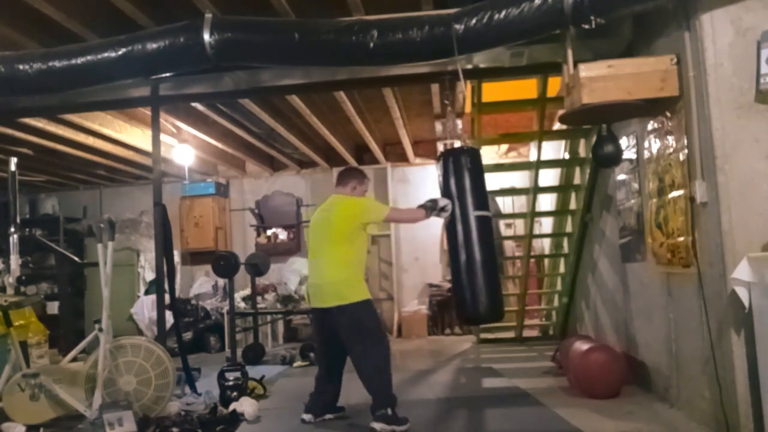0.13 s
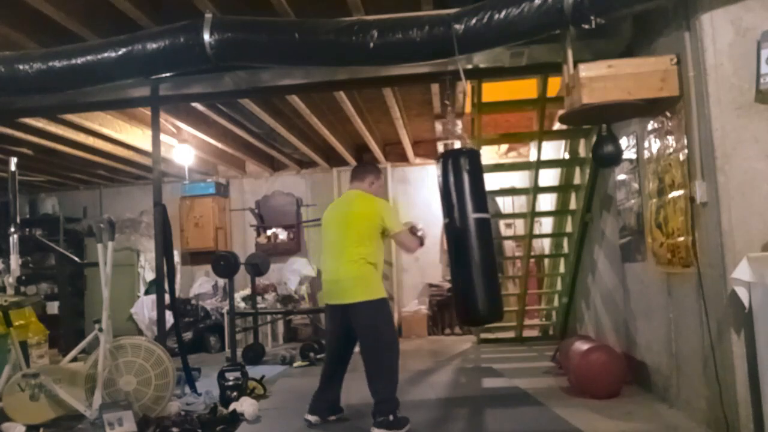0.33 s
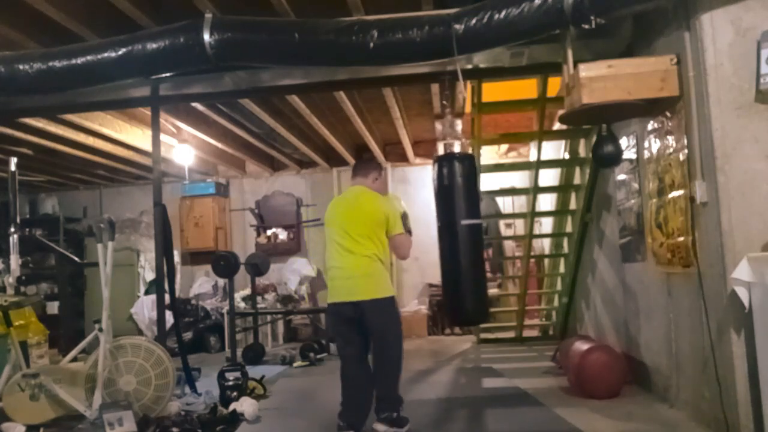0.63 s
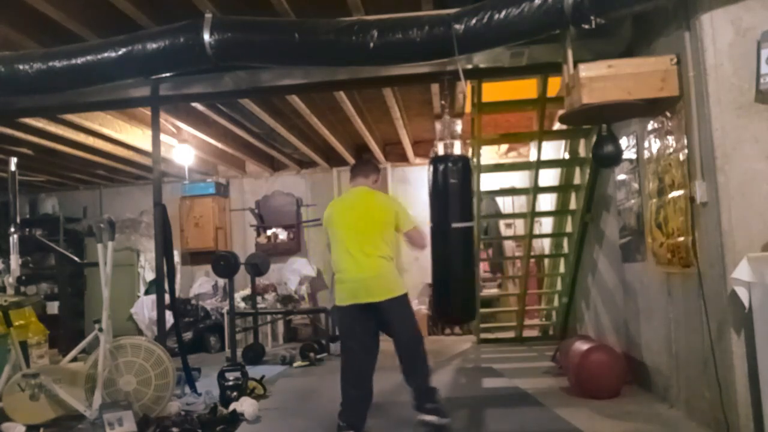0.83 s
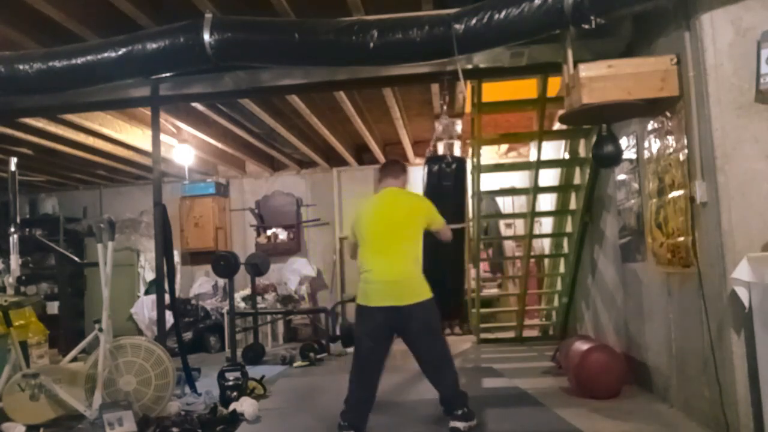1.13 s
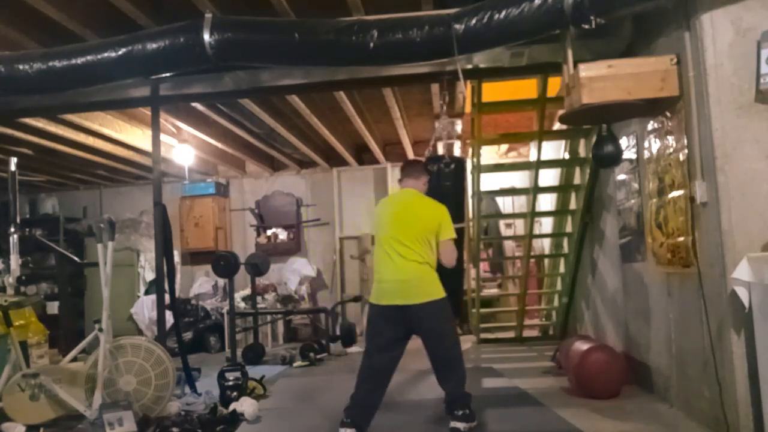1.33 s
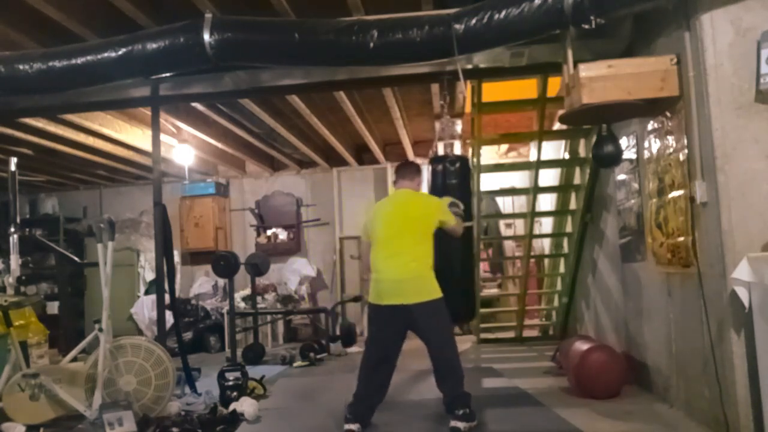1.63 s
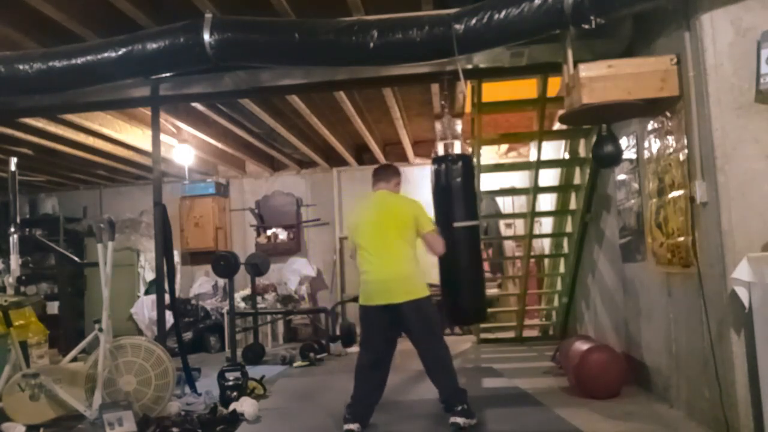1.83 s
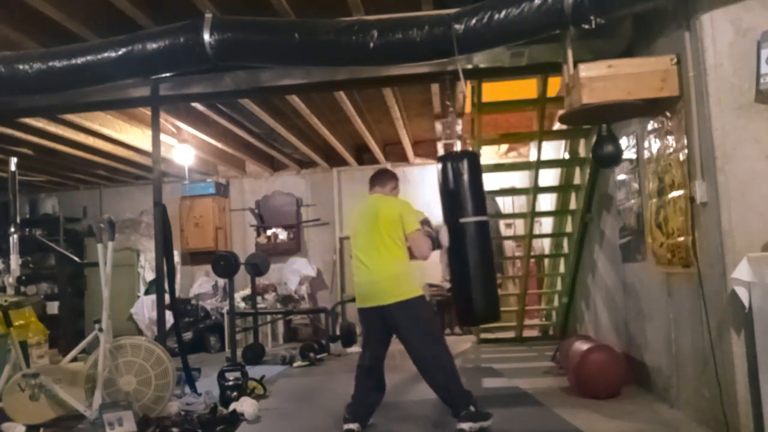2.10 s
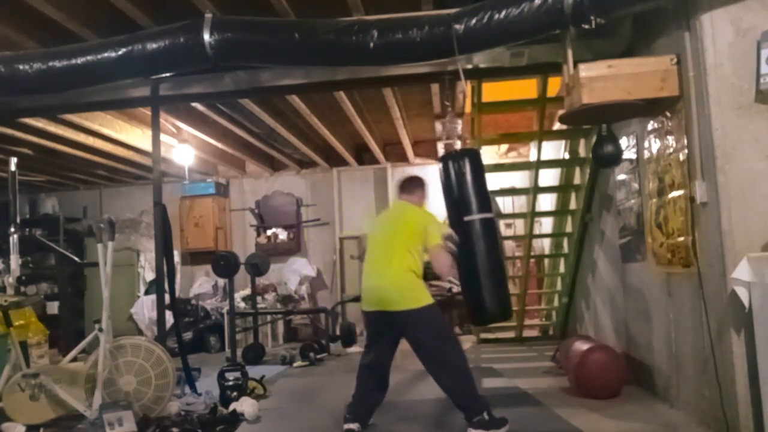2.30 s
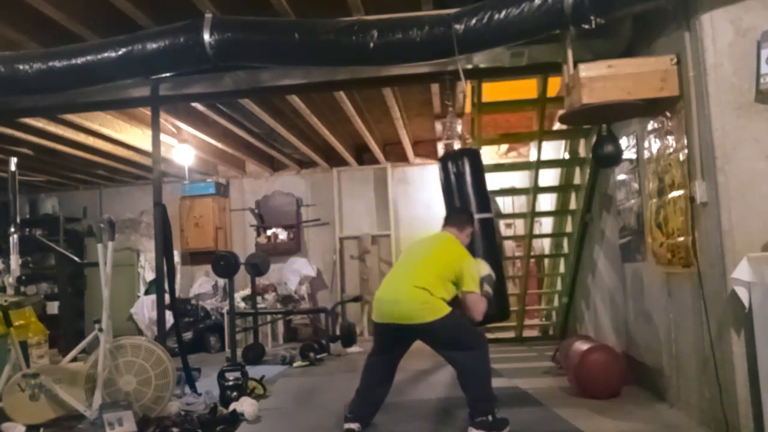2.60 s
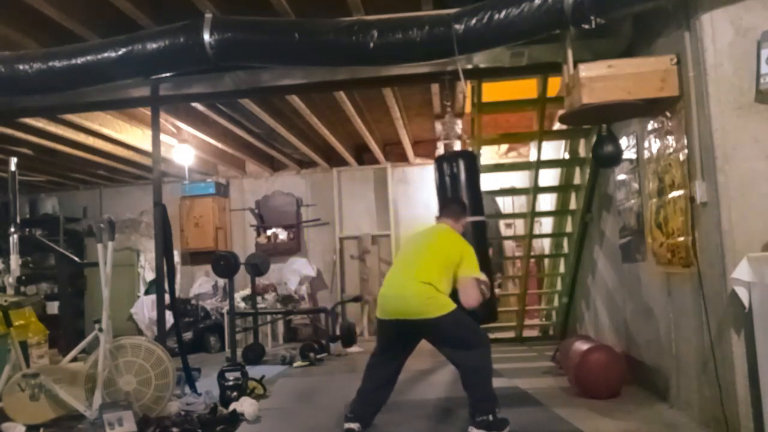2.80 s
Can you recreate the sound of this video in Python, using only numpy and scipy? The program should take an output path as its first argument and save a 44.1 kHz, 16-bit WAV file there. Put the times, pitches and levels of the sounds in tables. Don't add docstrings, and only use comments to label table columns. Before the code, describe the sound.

Gloved punches thud into a heavy bag as its chain jingles brightly and the hook squeals

```python
import sys
import numpy as np
from scipy import signal
from scipy.io import wavfile
from scipy.ndimage import uniform_filter1d

SR = 44100
rng = np.random.default_rng(int(sys.argv[2]) if len(sys.argv) > 2 else 0)


def persist_wave(psi):
    counts = np.round(np.clip(psi, -1, 1) * 32767).astype(np.int16)
    wavfile.write(sys.argv[1], SR, np.atleast_2d(counts).T)


def volts_from_decibels(level):
    exponent = np.asarray(level, float) / 20
    return 10 ** exponent


N = 130095

# t/s, jingle level/dB, swarm level/dB, rustle level/dB
SWING = [(0, -52.5, -28.5, -40), (.17, -73, -33.5, -52), (.25, -38, -19.5, -32), (.45, -51, -32, -39.5),
         (.56, -41.5, -25.5, -36.5), (.8, -54, -23, -45.5), (.95, -56, -51, -60.5), (1.05, -61, -35, -53.5),
         (1.1, -49, -37, -41.5), (1.4, -52, -27, -46), (1.9, -46.5, -25.5, -37), (2.35, -57.5, -36, -42),
         (2.55, -51, -31.5, -51), (2.71, -60, -44, -78), (2.95, -83, -44, -47.5)]
# f/Hz, spread/Hz, level/dB, T60/s
LOWER_LINKS = [(13650, 150, 0, .1), (10800, 130, -22, .13), (15710, 30, -20, .1)]
UPPER_LINKS = [(14680, 110, 0, .12)]
# f/Hz, width/Hz, level/dB
THUMP_PEAKS = [(77.2, 47, -5), (132, 26, -0.5), (181.4, 79, 1.5), (224, 72, -0.5)]


def evened(x):
    return x / np.sqrt(np.mean(x ** 2) + 1e-20)


def read(points, hz):
    f, value = np.transpose(points)
    return np.interp(np.log(hz + 1), np.log(f + 1), value)


def swing(column):
    rows = np.array(SWING)
    return volts_from_decibels(np.interp(np.arange(N) / SR, rows[:, 0], rows[:, column]))


def add(mix, s, sound):
    part = mix[round(s * SR):][:len(sound)]
    part += sound[:len(part)]


def burst(t, db, t60, rise):
    return volts_from_decibels(db - 60 * t / t60) * np.minimum(t / rise, 1)


def rings(x, peaks):
    out = 0
    for k, (hz, width, db) in enumerate(peaks):
        r = np.exp(-np.pi * width / SR)
        poles = [1, -2 * r * np.cos(2 * np.pi * hz / SR), r * r]
        out = out + (-1) ** k * volts_from_decibels(db) * evened(signal.lfilter([1, 0, -1], poles, x))
    return evened(out)


def hiss(shape, patchy_db, flicker_db=0):
    frames, hz = N // 128 + 5, np.fft.rfftfreq(512, 1 / SR)
    real, imag, patch = rng.standard_normal((frames, 257, 3)).T
    patch = evened(uniform_filter1d(uniform_filter1d(patch, 6, 0), 24, 1))
    flicker = evened(uniform_filter1d(rng.standard_normal(frames), 4))
    gain_db = read(shape, hz)[:, None] + patchy_db * patch + flicker_db * flicker
    z = (real + 1j * imag) * volts_from_decibels(gain_db)
    return evened(signal.istft(z, nperseg=512, noverlap=384)[1][:N])


def basement_air():
    # f/Hz, level/dB
    floor = [(30, 17), (120, 45), (300, -42), (3000, -88), (15000, -35)]
    # f/Hz, width/Hz, level/dB
    ducts = [(790, 40, 0), (2500, 100, -5), (3520, 60, -2)]
    air = volts_from_decibels(-71) * hiss(floor, patchy_db=5)
    air += volts_from_decibels(-67) * rings(rng.standard_normal(N), ducts)
    air += volts_from_decibels(-83) * rings(rng.standard_normal(N), [(35, 34, 0)])
    return air


def room(x):
    # f/Hz, T60/s
    decay = [(100, .45), (400, .42), (1300, .52), (4000, .36), (14000, .23)]
    taps = np.zeros(SR)
    at = np.arange(240, SR - 20, 20)
    taps[at + rng.integers(0, 20, len(at))] = rng.choice([-1., 1.], len(at))
    hz, t, z = signal.stft(taps, SR, nperseg=256)
    tail = signal.istft(z * volts_from_decibels(-60 * t / read(decay, hz)[:, None]), SR, nperseg=256)[1]
    return signal.fftconvolve(x, tail / np.linalg.norm(tail))[:N]


def link(modes, draw):
    t = np.arange(9000) / SR
    tone = 0
    for (hz, spread, db, t60), row in zip(modes, draw):
        for u in row:
            phase = 2 * np.pi * ((hz + spread * (2 * u - 1)) * t + u * 2.5)
            tone = tone + volts_from_decibels(db - 60 * t / t60) * np.sin(phase)
    return tone * np.minimum(t / .004, 1)


def clinks():
    # t/s, lower ring level/dB, upper ring level/dB
    strikes = [(0, -19, -39), (0.0253, -24.5, -38), (.1007, -25, -42), (.1283, -27.5, -38),
               (.1818, -27, -35), (.2703, -18, -23), (.3107, -13.5, -19), (.3642, -16, -22),
               (.3828, -20.5, -26), (.4374, -30, -20.5), (.573, -17.5, -32), (.616, -18, -28),
               (.628, -12, -35), (.7462, -19, -32), (0.7855, -32, -33), (0.827, -26.5, -24),
               (.969, -29.5, -48), (1.017, -27.5, -34), (1.0685, -34, -44), (1.1048, -22, -22.5),
               (1.167, -21, -31), (1.2052, -24, -29), (1.2231, -21.5, -33), (1.2999, -25, -36),
               (1.3365, -17.5, -24), (1.4596, -35.5, -41), (1.51, -21, -31), (1.5464, -16, -26),
               (1.558, -18, -21), (1.6756, -36, -37), (1.7055, -31, -21), (1.7808, -27, -32),
               (1.8078, -31, -26), (1.8447, -25, -24), (1.8755, -20.5, -22), (1.9245, -13, -24),
               (1.9714, -17.5, -33), (1.99, -23, -28), (2.0403, -21.5, -28), (2.1208, -20.5, -24),
               (2.2307, -26, -31), (2.2952, -39, -40), (2.3635, -37, -39), (2.396, -28.5, -28.5),
               (2.4917, -34, -30), (2.5726, -40.5, -42), (2.7237, -24.5, -38), (2.825, -28, -37),
               (2.8408, -27.5, -34)]
    # f/Hz, level/dB
    crash_shape = [(8000, -26), (13000, 23)]
    ringing, crash = np.zeros(N), np.zeros(N)
    t = np.arange(6000) / SR
    for (s, low_db, up_db), d in zip(strikes, rng.random((len(strikes), 2, 3, 5))):
        low = volts_from_decibels(low_db - 2.5) * link(LOWER_LINKS, d[0])
        high = volts_from_decibels(up_db - 1) * link(UPPER_LINKS, d[1])
        add(ringing, s - .0015, low + high)
        add(crash, s, burst(t, low_db - 7.5, t60=.13, rise=.0025))
    return ringing + crash * hiss(crash_shape, patchy_db=5)


def swarm():
    strength = volts_from_decibels(-6 * np.minimum(rng.exponential(1, N), 4))
    strikes = strength * (rng.random(N) < 140 / SR)
    which, out = rng.integers(0, 16, N), np.zeros(N)
    for k, d in enumerate(rng.random((16, 3, 4))):
        if k % 2:
            ring = volts_from_decibels(-9.5) * link(UPPER_LINKS, d)
        elif k % 3:
            ring = link(LOWER_LINKS[:1], d)
        else:
            ring = link(LOWER_LINKS, d)
        out += signal.oaconvolve(strikes * (which == k), ring)[:N]
    return volts_from_decibels(-4.5) * swing(2) * evened(out)


def rattle():
    # f/Hz, level/dB
    rattle_shape = [(2500, -10), (3050, -15), (3600, -8), (4500, -8), (6500, -2), (11000, -1), (15500, 4.5)]
    # t/s, level/dB
    ticks = [(0.272, -28), (0.3613, -26.5), (0.568, -31), (0.742, -36), (1.0613, -30), (1.1055, -25.5),
             (1.163, -29.5), (1.332, -34), (1.4481, -35.5), (1.539, -28), (1.704, -25.5), (1.8794, -49),
             (2.036, -30.5), (2.092, -31), (2.389, -30.5), (2.72, -40.5), (2.816, -38)]
    t = np.arange(6000) / SR
    tick = np.zeros(N)
    for s, db in ticks:
        add(tick, s, burst(t, db - 6.5, t60=.15, rise=.00034))
    return volts_from_decibels(4.5) * (swing(1) + tick) * hiss(rattle_shape, patchy_db=1)


def squeal(rows):
    s, hz, db, second_db = np.transpose(rows)
    t = np.arange(s[0], s[-1], 1 / SR)
    waver = evened(uniform_filter1d(rng.standard_normal(len(t)), 150))
    turn = 2 * np.pi * np.cumsum(np.interp(t, s, hz) * (1 + .005 * waver)) / SR
    edge = np.minimum(np.minimum(t - s[0], s[-1] - t) / .0045, 1)
    grip = evened(uniform_filter1d(uniform_filter1d(rng.standard_normal(len(t)), 250), 250))
    slip = 1 + .8 * np.sin(2 * np.pi * 80 * t + grip)
    overtones = volts_from_decibels(np.interp(t, s, second_db)) * np.sin(2 * turn) + volts_from_decibels(-26) * np.sin(3 * turn)
    tone = (1 + .3 * (slip - 1)) * np.sin(turn) + slip * overtones
    return s[0], edge * volts_from_decibels(np.interp(t, s, db) + 3.5 + .8 * grip) * tone


def hook():
    # t/s, f/Hz, level/dB, second harmonic level/dB
    first = [
        (.566, 1271, -48, -20),
        (.576, 1272, -41, -20),
        (.606, 1275, -42, -18),
        (.617, 1270, -55, -8),
        (.624, 1255, -34, -9),
        (.662, 1232, -36, -10),
        (.669, 1225, -56, -3),
        (.688, 1232, -47, -2),
        (.705, 1235, -55, -5),
    ]
    second = [
        (2.388, 1258, -42, -14),
        (2.414, 1252, -32, -17),
        (2.44, 1254, -45, -3),
        (2.462, 1254, -27, -16),
        (2.474, 1290, -31, -8),
        (2.494, 1305, -30, -15),
        (2.502, 1312, -39, -7),
        (2.532, 1322, -30, -13),
        (2.6, 1310, -40, -16),
    ]
    # t/s, length/s, f/Hz, level/dB
    chirps = [
        (.83, .04, 960, -51),
        (.19, .03, 800, -38),
        (.19, .03, 535, -39),
        (2.045, .03, 850, -44),
        (1.742, .033, 800, -36),
        (2.446, .025, 3760, -51),
        (.975, .08, 2960, -66),
        (1.0, .056, 1850, -65),
        (1.73, .06, 9250, -56),
    ]
    out = np.zeros(N)
    add(out, *squeal(first))
    add(out, *squeal(second))
    for s, length, hz, db in chirps:
        t = np.arange(0, length, 1 / SR)
        add(out, s, volts_from_decibels(db + 4) * np.sin(np.pi * t / length) ** .5 * np.sin(2 * np.pi * hz * t))
    return out


def sway():
    # f/Hz, level/dB
    rustle_shape = [(250, -4), (600, 1), (2000, -1.5), (2600, -6), (3050, -5.5), (3600, -7), (5000, -3.5)]
    boom = rings(rings(rng.standard_normal(N), THUMP_PEAKS), [(126, 91, 0)])
    boom = volts_from_decibels(-51) * evened(swing(3) ** .59) * boom
    return boom + swing(3) * hiss(rustle_shape, patchy_db=2.5, flicker_db=3)


def punches():
    # t/s, thump level/dB, body level/dB, slap level/dB
    blow_table = [(0.187, -21.5, -42, -68), (0.27, -19, -34.5, -24.5), (0.36, -21.5, -36, -32),
                  (0.571, -33, -50, -37), (0.702, -25.5, -40.5, -49), (1.059, -25, -34, -41.5),
                  (1.26, -28.5, -51.5, -71), (1.406, -25.5, -38, -52), (1.701, -24, -36, -44.5),
                  (1.742, -24, -38, -75), (1.889, -22, -37, -29), (2.089, -27.5, -39.5, -41.5),
                  (2.151, -24.5, -37.5, -31.5), (2.276, -29.5, -38, -34.5)]
    # f/Hz, width/Hz, level/dB
    body_peaks = [(270, 160, -4), (540, 180, 0), (790, 200, 0), (1050, 400, -5)]
    slap_peaks = [(1350, 300, -3), (1800, 200, 0), (2650, 450, 0), (3700, 1200, -8)]
    # t/s, peak level/dB, f/Hz
    knocks = [(0.196, -26.5, 157), (0.266, -24.5, 164), (0.353, -32.5, 161), (0.402, -32.5, 97),
              (0.562, -38, 125), (0.602, -42, 130), (0.687, -29.5, 165), (0.727, -35, 111),
              (1.064, -37, 153), (1.173, -35, 140), (1.257, -29, 121), (1.41, -36.5, 219.3),
              (1.467, -46, 151), (1.741, -23.5, 169), (1.817, -32, 206), (1.895, -28.5, 130),
              (2.094, -35, 207), (2.148, -25.5, 168), (2.298, -32.5, 89)]
    parts = [(THUMP_PEAKS, .26, .005, -16), (body_peaks, .14, .001, 3),
             (slap_peaks, .079, .003, 3)]
    t = np.arange(SR // 3) / SR
    out = np.zeros(N)
    for k, (peaks, t60, rise, gain_db) in enumerate(parts):
        env = np.zeros(N)
        for blow in blow_table:
            add(env, blow[0], burst(t, blow[k + 1] + gain_db, t60, rise))
        out += env * rings(rng.standard_normal(N), peaks)
    for s, db, hz in knocks:
        add(out, s - .004, burst(t, db, t60=.075, rise=.008) * np.sin(2 * np.pi * hz * t))
    return out


def scene():
    jingle = clinks() + swarm() + rattle()
    squeals = hook()
    blows = punches()
    wet = room(volts_from_decibels(-9) * squeals + volts_from_decibels(-2.5) * blows + volts_from_decibels(-2.5) * jingle)
    return (basement_air() + jingle + squeals + sway() + blows + wet)[None]


def roll_off(x):
    return signal.sosfilt(signal.butter(12, 16510, fs=SR, output="sos"), x)


def record(dry):
    # t/s, half width/s, depth level/dB
    wipes = [(.035, .007, -12), (.16, .016, -15), (.203, .007, -12), (.694, .01, -12), (.847, .01, -15),
             (.993, .01, -12), (1.76, .008, -12), (2.062, .008, -14), (2.456, .015, -40), (2.636, .008, -8),
             (2.716, .005, -25)]
    hz, t, z = signal.stft(dry[0], SR, nperseg=512, noverlap=384)
    power = uniform_filter1d(abs(z) ** 2, 3, 0)
    level = np.log(power + 1e-16)
    bar = np.quantile(level, 1 - .09, axis=0)
    weak = np.clip(2 * (bar - level), 0, 1)
    depth_db = sum(db * np.clip(5.8 * (1 - abs(t - s) / half), 0, 1) for s, half, db in wipes)
    slow_db = 10 * np.log10(abs(uniform_filter1d(power, size=12, axis=1)) + 1e-16)
    gate_db = -7 * np.clip((-79.5 - slow_db) / 5, 0, 1)
    z = z * volts_from_decibels(depth_db * weak + gate_db) * (hz < 15820)[:, None]
    x = signal.istft(z, SR, nperseg=512, noverlap=384)[1][None, :N]
    low_cut = signal.butter(2, 55, "high", fs=SR, output="sos")
    return roll_off(signal.sosfilt(low_cut, x))


dry = scene()
out = record(dry)
persist_wave(out)
```